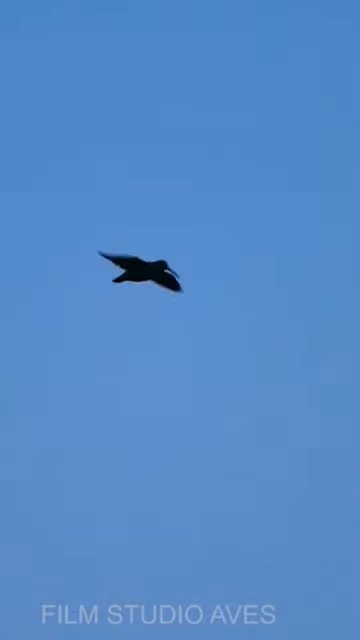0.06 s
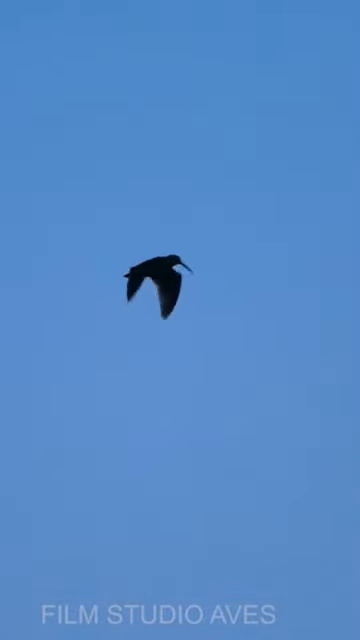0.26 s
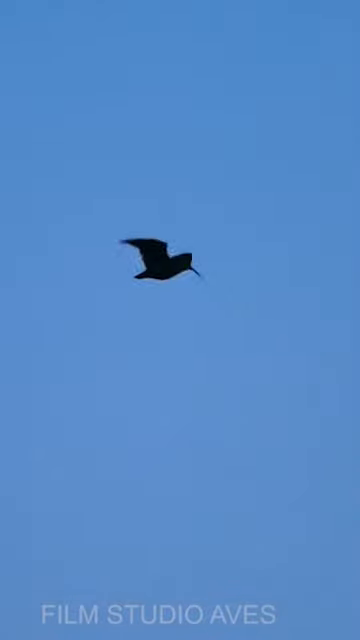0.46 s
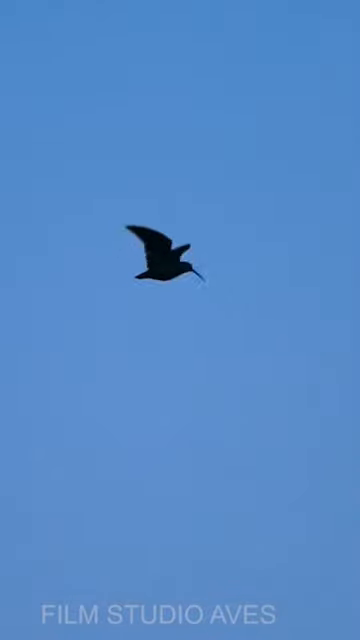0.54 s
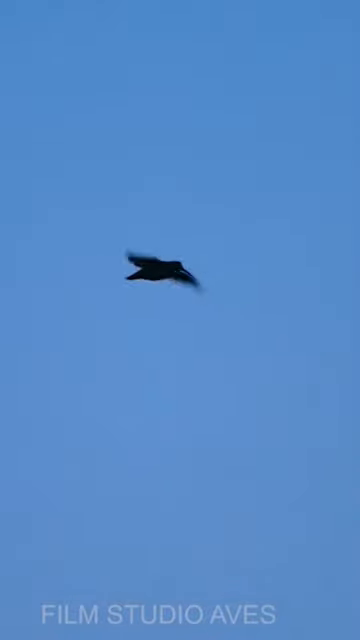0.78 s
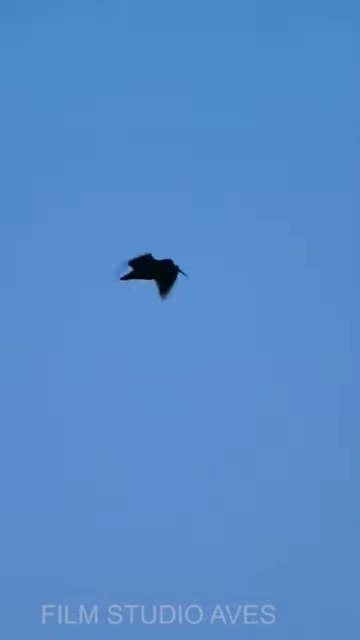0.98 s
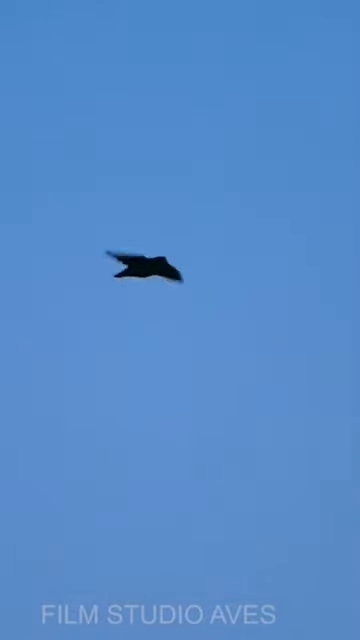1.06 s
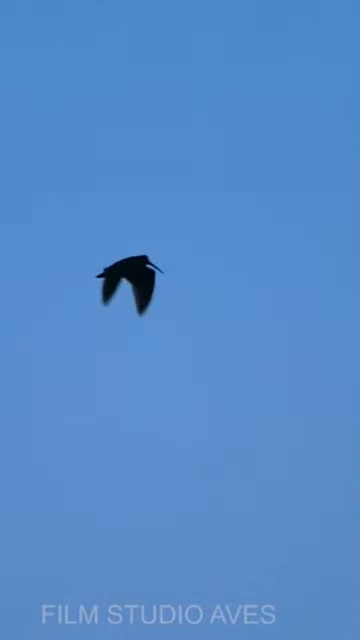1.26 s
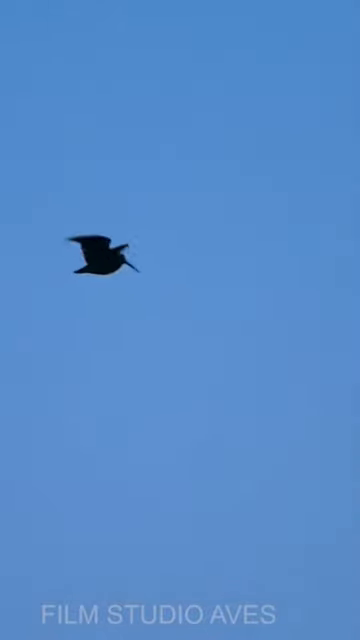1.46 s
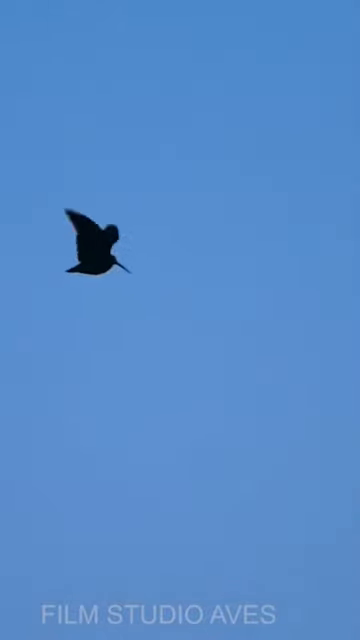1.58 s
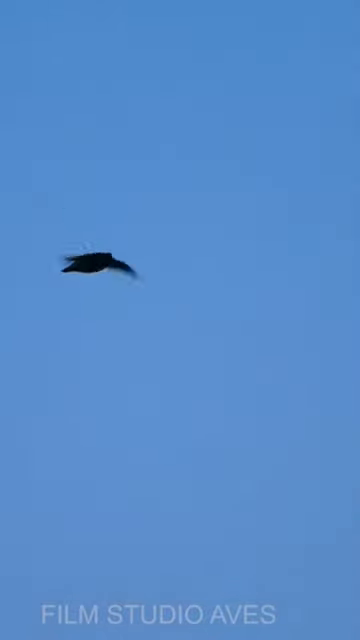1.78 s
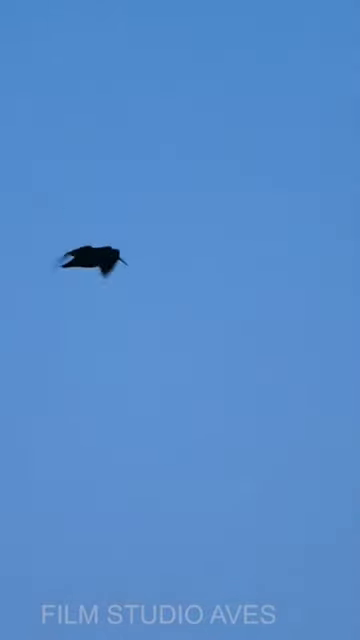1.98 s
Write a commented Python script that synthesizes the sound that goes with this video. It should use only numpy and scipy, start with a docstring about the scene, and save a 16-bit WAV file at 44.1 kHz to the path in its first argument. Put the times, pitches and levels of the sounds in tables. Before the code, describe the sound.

A woodcock flying over gives two rolling croaks and a broken third, then a sharp two-part squeak; a songbird whistles quickly beforehand, over hushed open country with soft echoes from trees, nearly mono.

```python
"""Dusk opens with a songbird's short sliding whistles over hushed open country, a faint airy hiss,
a far blurred chorus, a deep drone and a low rumble that swells with the high notes; all these are shaped noise
but the whistles, which are gliding sines. From 0.7 s a woodcock gives two croaking grunts and a broken third one,
rolls of separate throat pulses; a thin high slide passes during the first. At 1.8 s its two-part squeak sweeps
up, then down. Trees scatter the song, grunts and squeak back as soft noise tails."""
import sys
import numpy as np
from scipy import signal
from scipy.fft import rfft, irfft
from scipy.io import wavfile
from scipy.ndimage import uniform_filter1d

SR = 44100
rng = np.random.default_rng(int(sys.argv[2]) if len(sys.argv) > 2 else 0)


def invert_db(x):
    """Field ratio 10**(x/20) for x, a level in decibels (scalar or array-like)."""
    u = np.asarray(x, float) / 20
    return 10 ** u


def to_wav(s):
    """Save 16-bit WAV."""
    ch = np.atleast_2d(s).T  # columns
    pcm = np.round(np.clip(ch, -1, 1) * 32767)  # PCM
    wavfile.write(sys.argv[1], SR, pcm.astype(np.int16))


N = 89434
T = np.arange(N) / SR
OPPOSITE_SIDES = np.array([[1], [-1]])   # a side signal enters left and right with opposite signs


def rms_one(x):
    """Scale to rms 1."""
    return x / np.sqrt(np.mean(x ** 2) + 1e-20)


def along(curve, t=T):
    """Read a (time_s, value) curve at the times t."""
    return np.interp(t, *np.transpose(curve))


def drift(rate_hz):
    """Random wander of rms 1: white noise smoothed by two equal poles at rate_hz."""
    r = np.exp(-2 * np.pi * rate_hz / SR)
    wander = signal.lfilter([1], [1, -2 * r, r * r], rng.standard_normal(N + SR))
    return rms_one(wander[SR:])   # the first second lets the filter settle


def coloured(spectrum):
    """Noise of rms 1 whose spectrum follows the (pitch_hz, relative level_db) points and ends with them."""
    hz, db = np.transpose(spectrum)
    grid = np.maximum(np.arange(N // 2 + 1) * SR / N, 1)
    gain = invert_db(np.interp(np.log(grid), np.log(hz), db))
    inside = (grid > hz[0]) * (grid < hz[-1])
    return rms_one(irfft(rfft(rng.standard_normal(N)) * gain * inside, N))


def smooth(curve):
    """Round the corners of a curve over 60 samples, a little more than a millisecond."""
    return uniform_filter1d(curve, size=60)


def whistle(points, trill_depth_hz=0, overtone_db=-70):
    """A sine gliding through (time_s, pitch_hz, level_db) points, with a sine trill and a faint octave."""
    trill_hz = 163.5
    s, hz, db = np.transpose(sorted(points))
    pitch = smooth(np.interp(T, s, hz)) + trill_depth_hz * np.sin(2 * np.pi * trill_hz * (T - s[0]))
    phase = 2 * np.pi * np.cumsum(pitch) / SR
    sounding = (T >= s[0]) * (T <= s[-1])
    height = smooth(invert_db(np.interp(T, s, db)) * sounding)
    return height * (np.sin(phase) + invert_db(overtone_db) * np.sin(2 * phase))


def songbird():
    """Sliding notes, some trilled by a fast pitch wobble, with a slight random flutter in level."""
    # songbird notes: trill_depth_hz, then points of time_s, pitch_hz, level_db (peak, before the flutter)
    song_notes = [(0, [(.0, 4500, -32), (.004, 4690, -41), (.009, 4136, -29.5), (.013, 4800, -33),
                  (.036, 4740, -30), (.050, 4720, -33), (.055, 4300, -52)]), (0, [(.067, 4450, -52),
                  (.072, 4800, -30), (.080, 4450, -26), (.086, 4700, -44), (.0885, 4400, -34),
                  (.091, 4200, -55)]), (190, [(.141, 5700, -58.5), (.145, 5150, -29), (.150, 4303, -30),
                  (.165, 4280, -32.5), (.19, 4035, -31), (.205, 3924, -47), (.210, 4080, -29.5),
                  (.214, 4270, -46)]), (40, [(.215, 5005, -49), (.225, 5150, -41), (.229, 4800, -33),
                  (.236, 4795, -42), (.242, 4750, -31.5), (.249, 4900, -42), (.253, 4585, -38),
                  (.257, 4540, -50)]), (0, [(.274, 4750, -46.5), (.279, 4920, -38), (.287, 4095, -30),
                  (.291, 4760, -38.5), (.296, 4220, -40), (.299, 3924, -58)]), (130, [(.352, 4943, -47.5),
                  (.356, 5906, -49), (.360, 4570, -34.5), (.367, 4440, -32), (.372, 3953, -33.5),
                  (.379, 4000, -32.5), (.384, 3105, -51.5)]), (0, [(.4245, 5160, -51), (.427, 4500, -38),
                  (.431, 5260, -44), (.436, 4200, -60)]), (0, [(.436, 3300, -48), (.440, 3880, -37),
                  (.444, 4180, -37.5), (.446, 4250, -55)]), (200, [(.456, 4600, -52), (.461, 4750, -34),
                  (.468, 4500, -34), (.472, 4300, -38), (.476, 5300, -52)]), (120, [(.682, 6010, -53),
                  (.686, 5220, -40), (.691, 4580, -41.5), (.696, 4800, -43), (.703, 3910, -36),
                  (.708, 3730, -66)]), (0, [(.703, 5710, -58.5), (.709, 5100, -50), (.715, 4170, -43),
                  (.718, 4230, -63.5)]), (79.8, [(.752, 4500, -51), (.758, 4780, -36), (.762, 5180, -36.5),
                  (.767, 4910, -45), (.771, 5110, -53.5)]), (0, [(.762, 3130, -57), (.768, 3087, -48.5),
                  (.774, 3100, -53.5)]), (0, [(.763, 5470, -49), (.767, 6300, -52.5), (.774, 6300, -52)]),
                  (0, [(.779, 5190, -47), (.784, 5350, -37.5), (.790, 5230, -48), (.796, 5410, -44),
                  (.799, 5420, -61)]), (0, [(.802, 3510, -60), (.810, 4280, -52), (.816, 4530, -67)]),
                  (80, [(.837, 5470, -50.5), (.842, 5296, -33), (.848, 5205, -32.5), (.854, 4550, -36.5),
                  (.858, 5035, -33.5), (.862, 3800, -47), (.867, 3430, -47.5)]), (0, [(.837, 5800, -54),
                  (.843, 6400, -49), (.847, 6750, -55.5)]), (0, [(.859, 6600, -57), (.863, 5910, -41),
                  (.867, 5220, -41.5), (.871, 4710, -48), (.876, 5100, -59)]), (0, [(.911, 4335, -50),
                  (.915, 4800, -37), (.919, 4950, -39), (.922, 5700, -48), (.929, 5200, -50)]),
                  (0, [(.919, 3047, -45.5), (.930, 2550, -55)]), (200, [(.932, 3500, -48.5),
                  (.938, 4267, -42.5), (.942, 4640, -37), (.947, 5250, -42), (.952, 5020, -47),
                  (.956, 5020, -53.5)]), (0, [(1.017, 5890, -54), (1.022, 5780, -41), (1.029, 4740, -38.5),
                  (1.034, 4265, -42.5), (1.039, 4440, -36.5), (1.045, 3750, -38), (1.050, 3170, -48.5)]),
                  (0, [(1.099, 3310, -54), (1.105, 3390, -35), (1.109, 3580, -39), (1.112, 3100, -37.5),
                  (1.119, 3260, -49.5)]), (0, [(1.128, 5400, -54), (1.132, 4980, -42), (1.140, 5000, -43),
                  (1.143, 5200, -50), (1.151, 5150, -53)]), (0, [(1.099, 4500, -54), (1.102, 4350, -49),
                  (1.106, 4200, -58)]), (0, [(1.194, 6100, -60), (1.200, 5320, -43.5), (1.205, 4315, -43),
                  (1.209, 4100, -39), (1.215, 3670, -44), (1.224, 3480, -44), (1.232, 3700, -50)])]
    overtone_db = -47.5
    notes = sum(whistle(points, depth, overtone_db) for depth, points in song_notes)
    flutter_db = 1.56 * uniform_filter1d(drift(190), size=50)
    return notes * invert_db(flutter_db)


def trees(x, t60_s, level_db, side_db):
    """Scatter from many trunks: a dying noise tail, dulled on the way and stronger in mid than in side."""
    onset_s, treble_cut_hz = 0.00067, 8400
    lag = np.arange(SR) / SR
    decay = invert_db(-60 * lag / t60_s) * (1 - np.exp(-lag / onset_s))
    mid, side = rng.standard_normal((2, SR)) * decay
    tails = (mid + invert_db(side_db) * side * OPPOSITE_SIDES) / np.sqrt(np.sum(mid ** 2))
    scattered = invert_db(level_db) * signal.fftconvolve(x[None], tails, axes=1)[:, :N]
    return signal.sosfilt(signal.butter(8, treble_cut_hz, fs=SR, output="sos"), scattered)


def hush():
    """The hush of open country: shaped noise, nearly mono, slightly patchy in level."""
    # spectrum of the hush: pitch_hz, level_db (per Hz, relative)
    hush_colour = [(150, -21.5), (230, -26.5), (320, -12.5), (400, -6.5), (700, -4.5), (1000, -4.5),
                   (1600, -8), (2900, -11.5), (4300, -10), (5300, -29), (6300, -39), (7000, -67)]
    level_db, patchy_db, side_db = -57.5, 0.6, -27
    stereo = coloured(hush_colour) + invert_db(side_db) * coloured(hush_colour) * OPPOSITE_SIDES
    return invert_db(level_db + patchy_db * drift(14)) * stereo


def rumble(treble):
    """Lumpy low noise whose level follows the high notes, saturating with the strong ones."""
    # spectrum of the rumble: pitch_hz, level_db (per Hz, relative)
    rumble_colour = [(12, -11.5), (22, 10), (33, -19.5), (90, -6), (140, -16.5), (200, -32), (300, -44)]
    # rumble level at full swell: time_s, level_db
    full_swell = [(0, -43.5), (.3, -47.5), (.45, -50), (.85, -50.5), (1.1, -55), (1.8, -57), (2.02, -55.5)]
    knee_db, swell_s, lumps_db, lumps_hz, side_db = -49.5, 0.05, 2.0, 12, -40
    pressed = np.tanh(np.abs(treble) / invert_db(knee_db))
    swell = uniform_filter1d(pressed, int(swell_s * SR))
    mid = rms_one(coloured(rumble_colour) * invert_db(lumps_db * drift(lumps_hz)))
    side = invert_db(side_db) * coloured(rumble_colour) * OPPOSITE_SIDES
    return invert_db(along(full_swell)) * swell * (mid + side)


def far_chorus():
    """A far chorus blurred into one band of noise that comes and goes."""
    # spectrum of the chorus: pitch_hz, level_db (per Hz, relative)
    chorus_colour = [(2600, -55), (3100, -10.5), (3500, -5), (4000, -14.5), (4700, -45)]
    # loudness of the chorus: time_s, level_db
    chorus_level = [(0, -63), (1.0, -79), (1.25, -60), (1.5, -61), (1.8, -79.5)]
    return invert_db(along(chorus_level)) * coloured(chorus_colour)


def deep_drone():
    """Very low noise that rises and falls on a level curve of its own."""
    # spectrum of the drone: pitch_hz, level_db (per Hz, relative)
    drone_colour = [(12, -9.5), (30, -2), (55, -1.5), (120, -17), (200, -46.5)]
    # loudness of the drone: time_s, level_db
    drone_level = [(0, -87), (.6, -69), (1.55, -77), (1.8, -61), (2.02, -72.5)]
    return invert_db(along(drone_level)) * coloured(drone_colour)


def airy_hiss():
    """Faint steady noise in the top of the spectrum."""
    # spectrum of the hiss: pitch_hz, level_db (per Hz, relative)
    air_colour = [(6000, -9), (7500, -3.5), (10000, -1.5), (13000, 0), (15600, -8.5)]
    return invert_db(-86.5) * coloured(air_colour)


def pulse_times(closing_tick_s):
    """Throat pulse times in s: lone pulses, the closing tick, then rolls whose gaps shrink or widen."""
    # rolls of throat pulses: first_pulse_s, last_pulse_s, gap_shortening (share over the roll)
    rolls = [(0.7076, 0.9144, 0.13), (1.2456, 1.4143, 0.02), (1.4315, 1.4641, -.27),
             (1.6262, 1.6573, -0.33), (1.7243, 1.7749, 0.13)]
    # how many pulses each roll holds: count
    pulses_per_roll = (13, 12, 3, 3, 5)
    # pulses that stand alone: time_s
    lone_pulses = [1.5141, 1.5727, 1.6997, 1.7160]
    times = list(lone_pulses) + [closing_tick_s]
    for (first, last, shrink), count in zip(rolls, pulses_per_roll):
        u = np.linspace(0, 1, count)
        times += list(first + (last - first) * (u + shrink / 2 * u * (1 - u)))
    return times


def grunts():
    """Each throat pulse swells and dies within a few cycles of a sagging resonance, with a second above it."""
    # effort of the grunt: time_s, level_db (pulse peak before spread and low cut), pitch_hz (throat resonance)
    effort = [(.7076, -37, 1027), (.726, -24.5, 827), (.76, -21, 928), (0.831, -23.5, 930),
              (.882, -23, 940), (.914, -22, 1023), (1.245, -28, 992), (1.277, -21.5, 972),
              (1.34, -21.5, 985), (1.40, -27.5, 900), (1.431, -21, 974), (1.464, -22, 1013),
              (1.514, -26.5, 1024), (1.573, -32.5, 1028), (1.626, -44, 960), (1.64, -28.5, 1023),
              (1.656, -28, 976), (1.70, -33, 1004), (1.715, -37.5, 1000), (1.725, -24, 1010),
              (1.741, -19, 994), (1.762, -18, 1024), (1.775, -37.5, 1130), (1.787, -28.5, 1220)]
    # strength of the second resonance: time_s, level_db (against the main one, before spread)
    upper_level = [(.70, -22), (.915, -18.5), (1.24, -28.5), (1.37, -22.5), (1.39, -8), (1.47, -21.5),
                   (1.79, -15.5)]
    rise_s, sharpness, sag = 0.0044, 17.9, 0.02   # time to the top, shape, share of pitch lost per rise time
    longer_per_db, full_pulse_db = 0.03, -18.5   # weak pulses last longer
    closing_tick_s, tick_length = 1.7868, 0.55   # the last pulse is short: a share of the usual rise
    jitter_s, level_spread_db, pitch_spread, length_spread = 0.00005, 1.0, 0.02, 0.1
    upper_spread_db, phase_spread_rad, upper_ratio, low_cut_hz = 4.0, 0.2, 1.513, 544
    times = pulse_times(closing_tick_s)
    s, db, hz = np.transpose(effort)
    out = np.zeros(N + SR)
    for t, chances in zip(times, rng.standard_normal((len(times), 6))):
        late, loud, turn, high, long, bright = chances
        level_db = np.interp(t, s, db)
        pitch = np.interp(t, s, hz) * (1 + pitch_spread * high)
        rise = rise_s * np.exp(length_spread * long + longer_per_db * (full_pulse_db - level_db))
        if t == closing_tick_s:
            rise = rise_s * tick_length
        age = np.arange(1200) / SR / rise   # in rise times; the peak is at 1
        shape = (age * np.exp(1 - age)) ** sharpness
        sagging_age = (age - 1) - sag / 2 * (age - 1) ** 2
        phase = 2 * np.pi * pitch * rise * sagging_age + phase_spread_rad * turn
        upper_gain = invert_db(along(upper_level, t) + upper_spread_db * bright)
        upper = upper_gain * shape * np.cos(upper_ratio * phase)   # shape twice over: shorter
        pulse = shape * (np.cos(phase) + upper)
        i = int((t - rise + jitter_s * late) * SR)
        out[i:i + len(age)] -= invert_db(level_db + level_spread_db * loud) * pulse
    return signal.sosfilt(signal.butter(2, low_cut_hz, "high", fs=SR, output="sos"), out[:N])


def high_slide():
    """A thin whistle gliding down from the top of the treble."""
    # the slide: time_s, pitch_hz, level_db (peak)
    slide = [(.850, 9870, -65), (.859, 9300, -62), (.864, 7680, -50), (.869, 6380, -53)]
    return whistle(slide)


def squeak():
    """Two whistled sweeps, up and down; a second voice lingers above the falling one; the level flutters."""
    # one list per sweep or voice: time_s, pitch_hz, level_db (peak, before the flutter)
    sweeps = [
        [(1.782, 2600, -52), (1.7872, 3400, -43), (1.789, 3680, -22), (1.7925, 4150, -17.5),
         (1.794, 4350, -12.3), (1.798, 4750, -12), (1.801, 5250, -20), (1.802, 5450, -42), (1.803, 5600, -25),
         (1.806, 5950, -48)],
        [(1.8715, 6050, -50), (1.874, 5550, -27), (1.877, 4850, -14.5), (1.8782, 4500, -19.5),
         (1.8812, 3750, -21), (1.883, 3200, -28), (1.8852, 2950, -30), (1.8865, 2750, -50)],
        [(1.878, 4750, -40), (1.8797, 4550, -25), (1.882, 4350, -23), (1.8835, 4150, -42)],
    ]
    return sum(whistle(points) for points in sweeps) * invert_db(0.6 * drift(340))


def leaf_scatter(x):
    """Leaves scatter the highs more: a slope of 6 dB an octave, even at 4300 Hz."""
    return np.gradient(x) * SR / (2 * np.pi * 4300)


def scene():
    """Birds and their tails from the trees, placed a touch right, over the background."""
    song, grunt, squeaks = songbird(), grunts(), squeak()
    tails = trees(song, t60_s=0.24, level_db=-12.5, side_db=-10)
    tails = tails + trees(grunt, t60_s=0.2, level_db=-12, side_db=-21)
    tails = tails + trees(leaf_scatter(squeaks), t60_s=0.53, level_db=-14, side_db=-10)
    birds = song + grunt + high_slide() + squeaks + tails
    pan_db = [[-0.2], [0.2]]   # left, right
    background = hush() + rumble(song + squeaks) + far_chorus() + deep_drone() + airy_hiss()
    return birds * invert_db(pan_db) + background


def roll_off(x):
    """The treble ends steeply here."""
    return signal.sosfilt(signal.butter(12, 15700, fs=SR, output="sos"), x)


def record(dry):
    """Deliver the finished mix."""
    return roll_off(dry)


dry = scene()
out = record(dry)
to_wav(out)
```